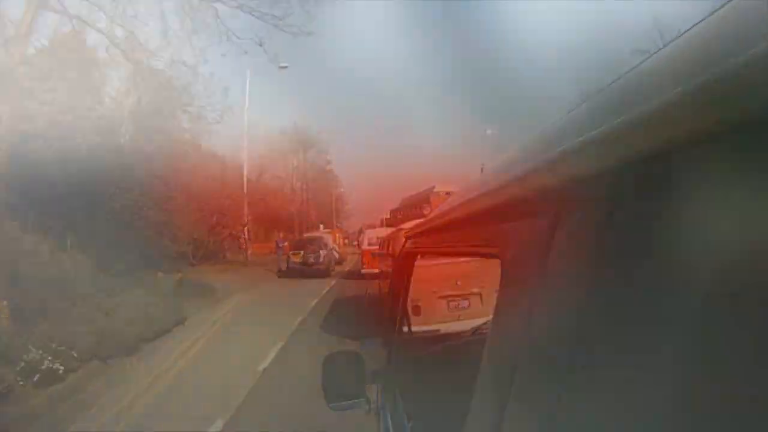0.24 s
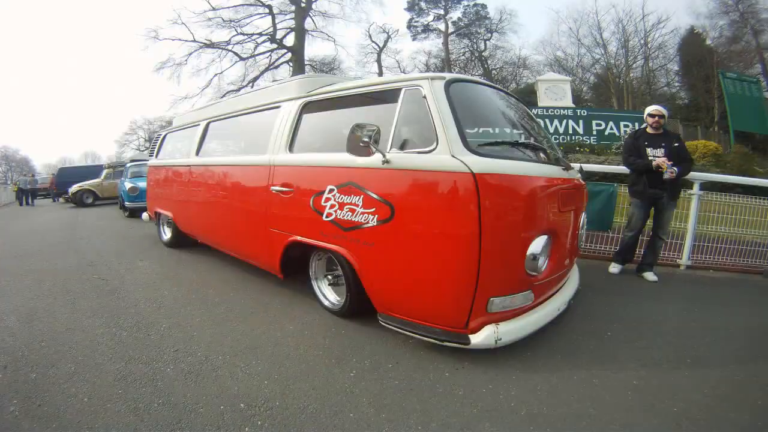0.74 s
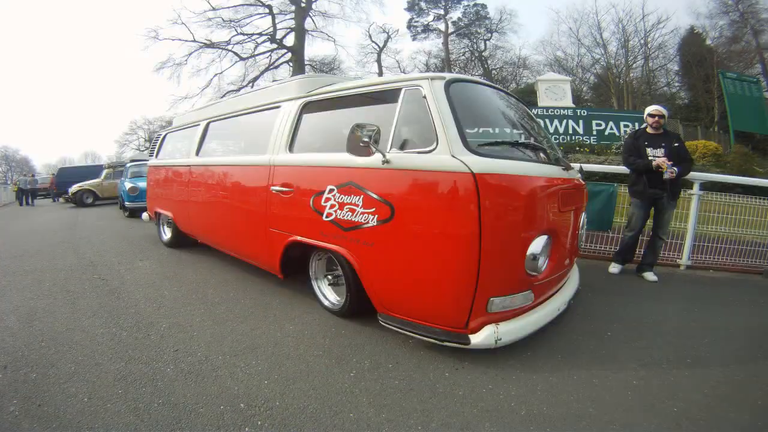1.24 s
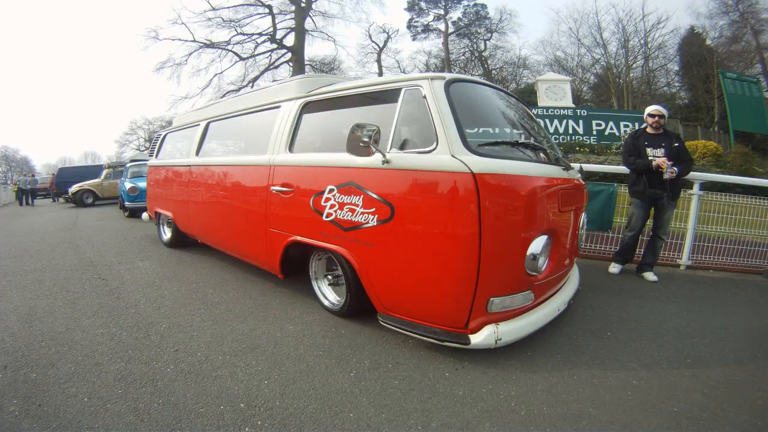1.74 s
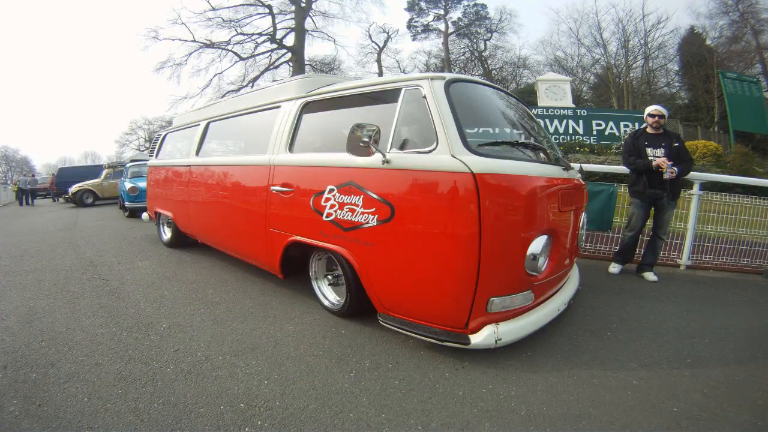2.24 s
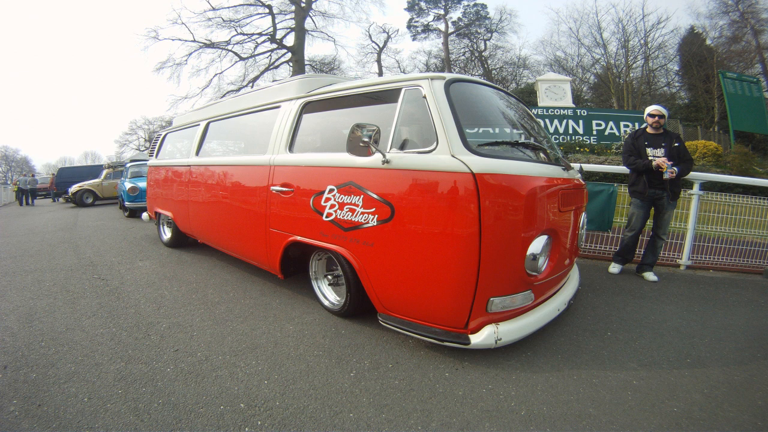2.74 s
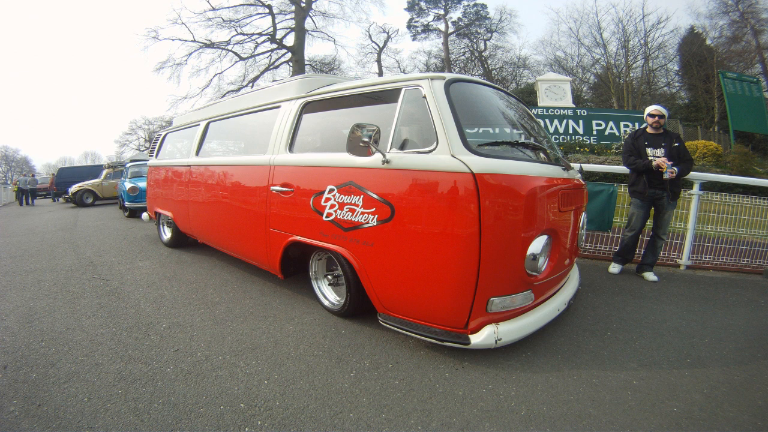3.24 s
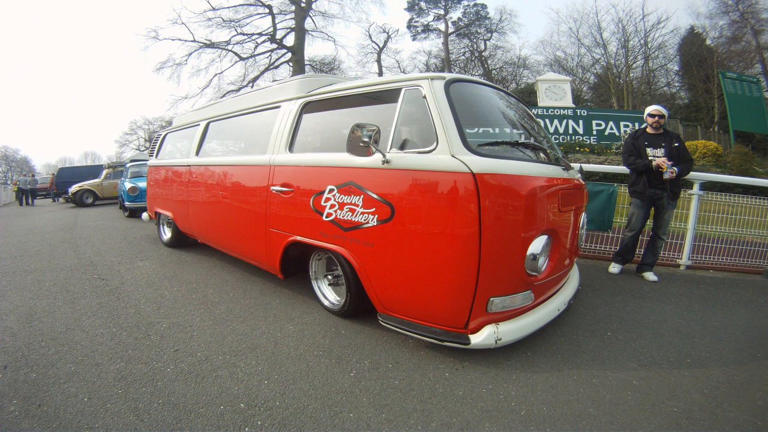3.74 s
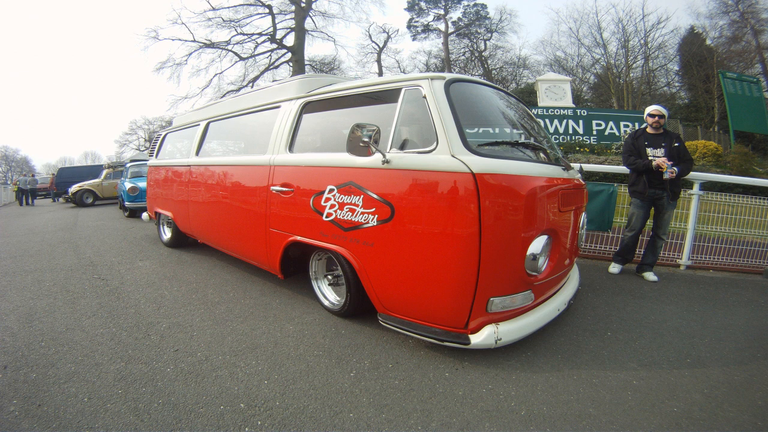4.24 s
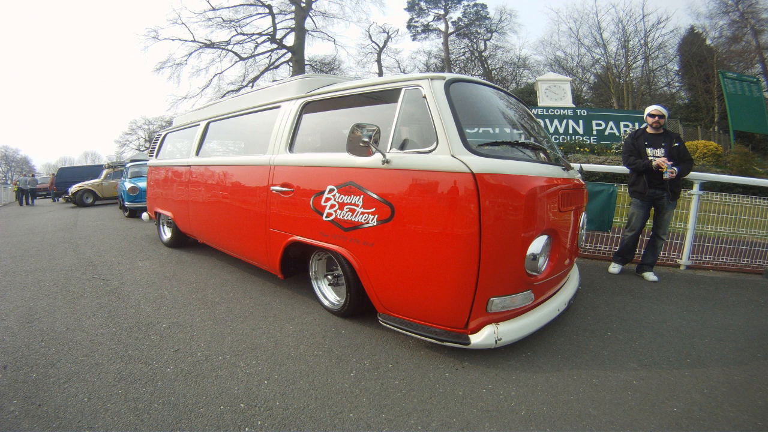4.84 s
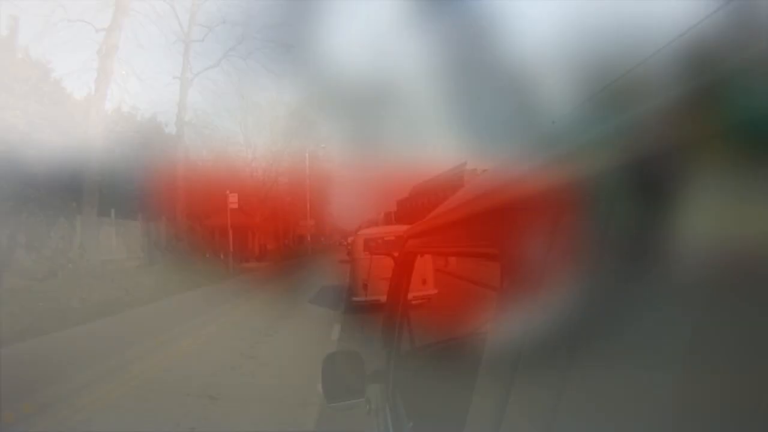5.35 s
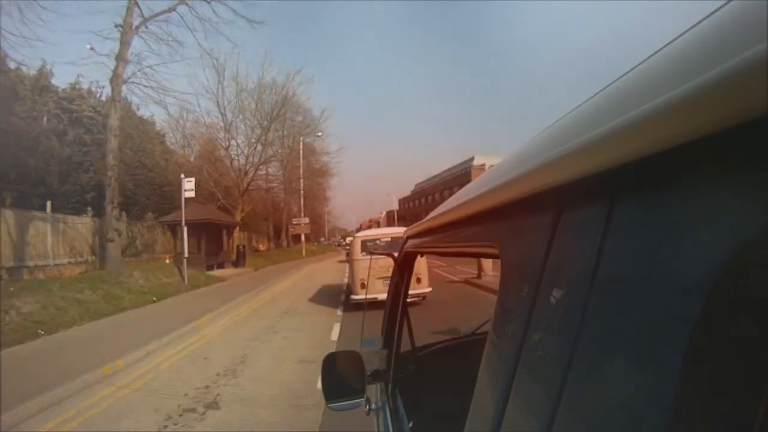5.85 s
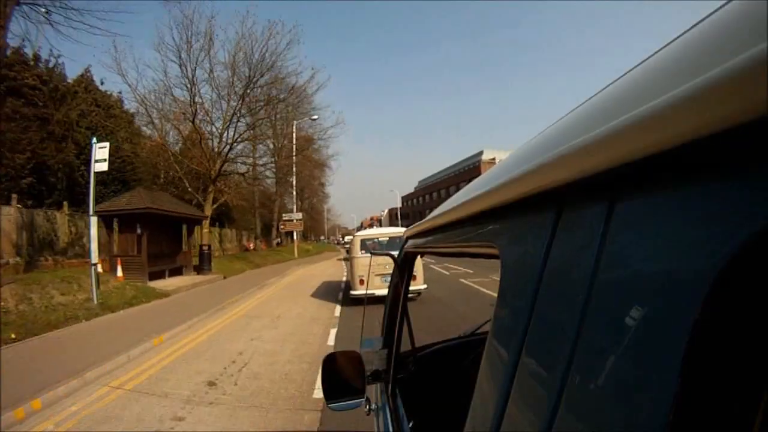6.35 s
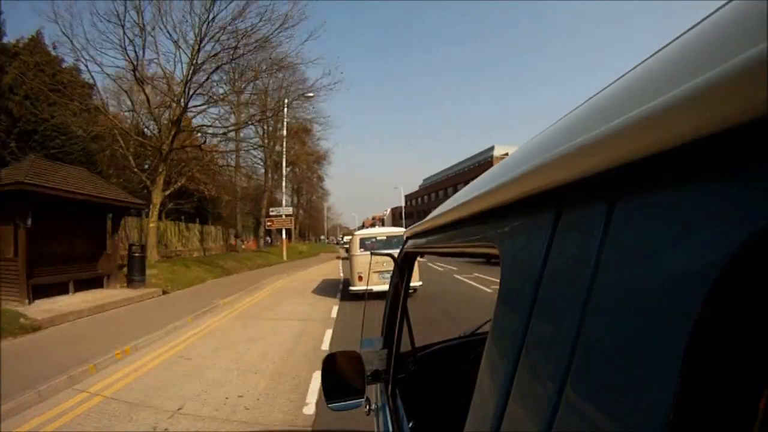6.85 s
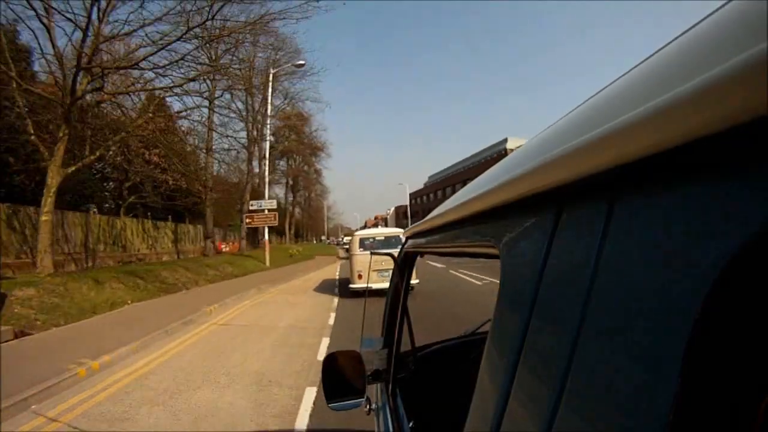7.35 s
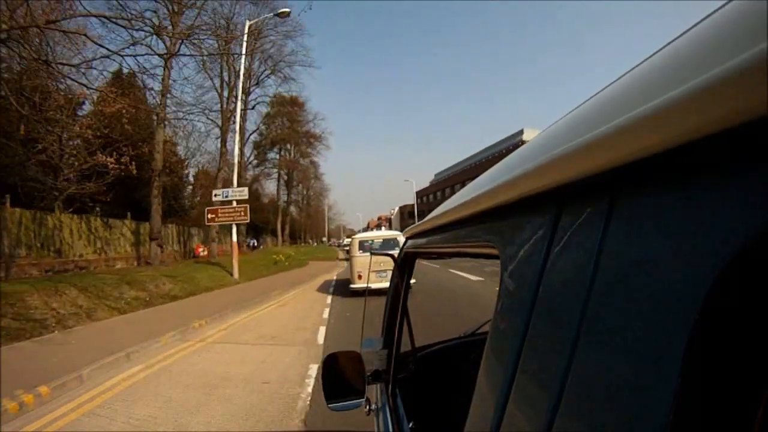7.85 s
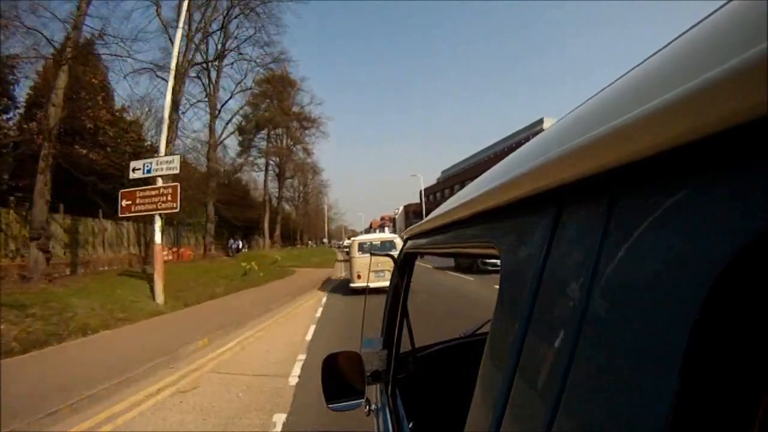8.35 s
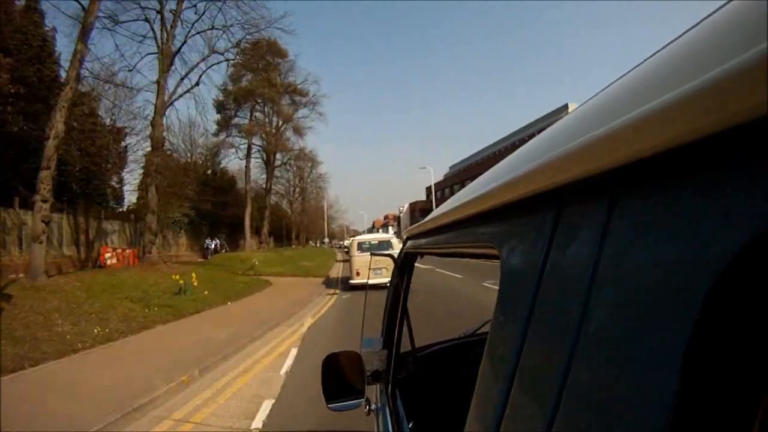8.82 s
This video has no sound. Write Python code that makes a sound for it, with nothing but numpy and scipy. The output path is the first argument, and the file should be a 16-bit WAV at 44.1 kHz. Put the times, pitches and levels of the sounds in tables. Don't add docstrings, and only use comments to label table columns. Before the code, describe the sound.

An old van's air-cooled engine idles along softly, then pulls harder and climbs in pitch over rumbling road, with bumps and a metallic rattle near the end.

```python
import sys
import numpy as np
from scipy import signal
from scipy.io import wavfile
from scipy.ndimage import uniform_filter1d

SR = 44100
rng = np.random.default_rng(int(sys.argv[2]) if len(sys.argv) > 2 else 0)


def inscribe(sig):
    pcm = np.round(np.clip(np.atleast_2d(sig).T, -1, 1) * 32767)
    wavfile.write(sys.argv[1], SR, pcm.astype(np.int16))


def amplitude_ratio(level_db):
    exponent = np.asarray(level_db, float) / 20
    return 10 ** exponent


N = 400428
T = np.arange(N) / SR


def evened(x):
    return x / np.sqrt(np.mean(x ** 2) + 1e-20)


def levelled(x, seconds):
    power = uniform_filter1d(x ** 2, int(seconds * SR))
    power = uniform_filter1d(power, int(seconds * SR / 2))
    return x / np.sqrt(abs(power) + 1e-20)


def curves(rows):
    t, *columns = np.transpose(rows)
    return [np.interp(T, t, column) for column in columns]


def read(points, hz):
    f, value = np.transpose(points)
    return np.interp(np.log(hz + 1), np.log(f + 1), value)


def bell(t, middle, half):
    return np.exp(-((t - middle) / half) ** 2 / 2)


def lifts(rows):
    t = T[::64]
    return np.interp(T, t, sum(db * bell(t, middle, half) for middle, half, db in rows))


def bursts(rows, floor_db):
    t = T[::64]
    swell = sum(amplitude_ratio(db) * bell(t, middle, half) for middle, half, db in rows)
    return amplitude_ratio(floor_db) + np.interp(T, t, swell)


def drift(top_hz, step=1):
    steps = rng.standard_normal(N // 128 + 2)
    slow = signal.filtfilt(*signal.butter(1, min(top_hz, 150), fs=SR / 128), steps)
    return np.interp(np.arange(0, N, step) / 128, np.arange(len(slow)), evened(slow))


def resonate(x, hz, width):
    r = np.exp(-np.pi * width / SR)
    return 2 * signal.lfilter([1 - r], [1, -r * np.exp(2j * np.pi * hz / SR)], x).real


def panel_ring():
    hiss = resonate(resonate(rng.standard_normal(N), 719, 80), 719, 80)
    return amplitude_ratio(-50.5 - 0.53 * T) * evened(hiss)


# t/s, half length/s, level/dB
ROCKS = [(.26, 0.1, -27.5), (.63, 0.066, -29), (1.04, 0.066, -32), (1.72, 0.17, -25), (2.05, 0.093, -29),
         (2.38, 0.062, -35), (2.6, 0.053, -27), (2.76, .07, -28), (3.33, 0.055, -33), (3.72, 0.063, -25),
         (4.17, 0.11, -22), (4.45, 0.033, -26), (4.63, .07, -27), (5.2, 0.081, -26), (5.55, .12, -25),
         (5.99, 0.093, -27), (6.45, 0.15, -29), (6.93, 0.047, -22), (7.23, 0.042, -17), (7.47, .05, -24),
         (7.71, 0.08, -23), (8.08, 0.058, -24), (8.25, .04, -26), (8.45, 0.056, -18.5), (8.75, 0.15, -28),
         (9.07, 0.062, -19)]
# t/s, half length/s, level/dB
BOOMS = [(.5, 0.2, -27), (1.08, 0.22, -26.5), (1.75, 0.33, -30), (2.24, 0.18, -27), (3.0, 0.1, -32),
         (3.5, 0.19, -29), (4.2, 0.24, -21), (4.75, 0.25, -22.5), (5.22, 0.13, -26), (5.75, 0.11, -26),
         (.15, 0.061, -29.5), (2.7, 0.15, -31), (5.5, 0.064, -29), (5.9, .08, -30), (6.5, 0.2, -25),
         (7.9, 0.053, -30), (7.0, 0.099, -19.5), (7.45, 0.19, -22), (8.25, 0.12, -24), (8.75, 0.13, -21.5)]
# t/s, f/Hz
CABIN = [(0, 86), (2.2, 86), (3.8, 87), (4.5, 78), (5.6, 85), (6.4, 93), (7.0, 95), (7.7, 102), (8.15, 106),
         (8.4, 86), (9.08, 84)]


def rumble():
    shaking = rng.standard_normal(N)
    sway = levelled(resonate(resonate(shaking, 26.7, 1.8), 30.6, 3.5), 0.11)
    low_pass = signal.butter(2, 10.5, fs=SR, output="sos")
    air = signal.sosfilt(low_pass, rng.standard_normal((2, N)))
    angle = 2 * np.pi * np.cumsum(curves(CABIN)[0]) / SR
    boom = air[0] * np.cos(angle) + air[1] * np.sin(angle)
    return bursts(ROCKS, -41) * sway + bursts(BOOMS, -53) * levelled(boom, 0.16)


# t/s, thump level/dB, gain dip/dB, recovery/s
JOLTS = [
    (4.634, -22, 1.5, 0.16),
    (6.919, -22, 4.5, 0.078),
    (7.201, -20, 7, 0.43),
    (8.119, -20, 6.5, 0.15),
    (8.598, -20, 4, 0.12),
]


def jolts():
    t, out = np.arange(3000) / SR, np.zeros(N)
    push = np.sin(2 * np.pi * 85 * t) * np.exp(-t / 0.024) * np.minimum(t / 0.009, 1)
    for s, db, *_ in JOLTS:
        out[round(s * SR) - 130:][:len(t)] += amplitude_ratio(db) * push
    return out


# t/s, level/dB
KNOCKS = [(6.899, -36), (6.9022, -35), (6.905, -32), (6.908, -33), (6.9105, -32), (6.9122, -28),
          (6.9148, -32), (6.9168, -28.5), (6.9196, -29.5), (6.9208, -32), (6.9235, -32), (6.937, -41),
          (7.131, -42), (7.1767, -36), (7.181, -34), (7.188, -40), (7.194, -42), (7.2095, -37), (7.29, -40)]
# f/Hz, level/dB, time to fall 60 dB/s
LOOSE = [(1064, -2.5, .04), (1400, -8, .03), (1700, -6, 0.023), (2000, -8, .03), (2230, -6, 0.027),
         (2750, -3.5, 0.05), (3480, -2.5, 0.05), (3650, -11, 0.035), (5290, -7, 0.06)]


def knocks():
    t, out = np.arange(3000) / SR, np.zeros(N)
    for s, db in KNOCKS:
        ring = sum(amplitude_ratio(d - 60 * t / t60) * np.sin(2 * np.pi * (hz * t + rng.random()))
                   for hz, d, t60 in LOOSE)
        scrape = 0.66 * rng.standard_normal(len(t)) * np.exp(-t / .003)
        hit = (ring * np.exp(-t / 0.016) + scrape) * np.minimum(t / 0.00048, 1)
        out[round(s * SR):][:len(t)] += amplitude_ratio(db) * hit
    return out


# t/s, f/Hz, level/dB
AXLE = [(0, 100, -34), (.6, 101, -34), (1.2, 104, -32), (1.8, 109, -32), (2.25, 116.5, -31.5),
        (2.6, 125, -48), (3, 133.5, -35.5), (3.7, 145, -37), (4, 151, -39)]


def axle():
    hz, db = curves(AXLE)
    drowned_db = 40 * np.maximum(T - 3.9, 0)
    angle = 2 * np.pi * np.cumsum(hz) / SR + .5 * drift(3)
    return np.sqrt(2) * amplitude_ratio(db - drowned_db) * np.cos(angle)


# f/Hz, level/dB
STEADY_HUMS = [(195, -38), (389, -44), (780, -53), (2770, -63),
               (737.5, -55)]


def hums():
    out = np.zeros(N)
    for hz, db in STEADY_HUMS:
        out += amplitude_ratio(db + 1.2 * drift(3)) * np.cos(2 * np.pi * hz * T + .7 * drift(4))
    return out * amplitude_ratio(-.7 * T)


# t/s, half length/s, level/dB
WHIRRS = [(.2, 0.22, -49.5), (.8, 0.27, -49.5), (1.25, 0.17, -58), (3.0, .1, -57), (5.3, 0.22, -55),
          (5.9, .15, -57), (6.8, 0.14, -51), (7.6, 0.086, -47), (1.7, 0.39, -53), (3.35, 0.16, -45.5),
          (4.19, 0.07, -45), (4.5, 0.19, -41), (6.4, 0.33, -49.5), (8.05, 0.09, -40), (8.5, 0.16, -41),
          (8.8, 0.16, -40.5)]


def whirr(turns):
    hz, width_hz = 2150, 284
    flutter_db = 1.9 * np.cos(4 * np.pi * turns) + 1.9 * np.cos(2 * np.pi * (turns - .1))
    grain = amplitude_ratio(4 * drift(60) + flutter_db) * rng.standard_normal(N)
    ring = resonate(resonate(grain, hz, width_hz), hz, width_hz)
    return bursts(WHIRRS, -73) * evened(ring)


# f/Hz, level/dB per Hz
HISS = [(71, -14.5), (120, -11.5), (146, -8), (203, -5), (342, -24.5), (578, -13.5), (828, -27),
        (1090, -23), (1270, -31), (1540, -28), (1820, -32.5), (2170, -21), (2920, -32), (3790, -30.5),
        (6000, -47.5), (7800, -67), (13200, -120)]
# f/Hz, width/Hz, lift level/dB
TINWARE = [(140, 33, -2.5), (308, 51, 2), (675, 43, -5), (730, 40, -1.5), (896.8, 28, 14), (1094, 28, 10),
           (1548, 27, 4), (1900, 220, -2), (2093, 45, 4), (2260, 390, 1.5), (2738, 64, 9), (2936, 130, -6),
           (3113, 440, 6), (5320, 590, 8.5)]
# t/s, half length/s, lift level/dB
RATTLES = [(6.93, 0.02, 4), (7.2, 0.043, 1), (7.61, 0.064, 3.5), (8.07, 0.028, 2.5), (3.0, .1, 0.5),
           (3.45, 0.075, 1), (4.15, 0.046, 1), (8.3, .04, 0.5), (8.55, 0.04, 0.5), (8.95, .05, 0.5)]


def clatter(turns, effort_db):
    load_db = effort_db + lifts(RATTLES)
    frames, hz = N // 256 + 5, np.fft.rfftfreq(1024, 1 / SR)
    a, b, patches = rng.standard_normal((frames, 513, 3)).T
    patches = evened(uniform_filter1d(uniform_filter1d(patches, 14, 0), 8, 1))
    ring_db = sum(db / (1 + (2 * (hz - f) / w) ** 2) for f, w, db in TINWARE)
    frame_load_db = load_db[np.minimum(np.arange(frames) * 256, N - 1)]
    octaves_up = np.log2(np.clip(hz, 3500, 6000) / 3500)
    bright_db = .6 * np.outer(octaves_up, np.minimum(frame_load_db, 5))
    z = (a + 1j * b) * amplitude_ratio((read(HISS, hz) + ring_db)[:, None] + bright_db + 0.4 * patches)
    noise = signal.istft(z, nperseg=1024, noverlap=768)[1][:N]
    throb_db = 0.38 * np.cos(2 * np.pi * turns) + 0.63 * np.cos(8 * np.pi * turns) + 0.29 * drift(36)
    return amplitude_ratio(load_db - 34 + throb_db) * evened(noise)


# f/Hz, width/Hz, level/dB
PIPE = [(560, 90, -3), (900, 60, -3), (1120, 70, 0), (1300, 150, -9), (1500, 90, -6)]


def exhaust(turns, pipe_db):
    puffs = (0.67 + np.exp(-(4 * turns % 1) / 0.07)) * rng.standard_normal(N)
    ring = sum(amplitude_ratio(db) * resonate(resonate(puffs, hz, w), hz, 1.6 * w) for hz, w, db in PIPE)
    return amplitude_ratio(pipe_db - 47.5) * evened(ring)


# f/Hz, level/dB
BODY = [(25, -45), (50, -45), (90, -30.5), (110, -36), (145, -50.5), (200, -38), (235, -47.5), (270, -46),
        (330, -52.5), (430, -54), (500, -60), (560, -44), (640, -68.5), (1100, -61.5)]
LOW_ORDERS_DB = [5, 6.5, 0, 4, 0, 3.5, 6, 6.5, 1, 0, 1.6, 3, -3, -3.5, 2.5, 1]
WEAKER = (18, 21, 24, 26, 38)
# t/s, level/dB
FIRING = [(0, -44), (0.4, -49), (0.8, -50), (1.25, -34), (1.9, -50), (3.5, -44), (3.63, -34), (4.0, -36),
          (4.27, -21.5), (4.75, -18.5), (5.4, -18), (6.0, -20.5), (6.5, -34.5), (6.9, -14), (7.3, -11.5),
          (7.9, -14), (8.3, -14), (9.08, -20.5)]
# t/s, half length/s, level/dB
FALTERS = [(5.0, 0.049, -15), (6.12, 0.059, -21), (7.08, 0.075, -5.5), (7.24, 0.033, 4), (8.1, 0.076, -2),
           (8.5, .05, -7.5), (8.117, .008, 5.5), (8.597, .008, 6.5)]
# t/s, half length/s, level/dB
SURGES = [(.18, 0.04, -30), (.5, 0.078, -39), (1.75, 0.037, -25), (2.0, 0.054, -35), (2.27, 0.055, -46),
          (2.55, 0.072, -36), (2.88, 0.036, -27), (3.25, 0.071, -23), (3.5, 0.055, -24), (3.82, 0.14, -19),
          (4.13, 0.11, -29), (4.5, 0.088, -29), (4.86, 0.046, -24.5), (5.5, 0.037, -29),
          (5.92, 0.11, -32.5), (6.25, 0.094, -30.5), (6.63, 0.036, -24), (8.62, .08, -32),
          (6.9, 0.075, -30)]
# t/s, multiple, half length/s, level change/dB
TONE_SWINGS = [(2.58, 16, 0.51, 12.5), (2.67, 13, 0.12, 8), (2.87, 20, 0.54, 8.5), (3.09, 5, 0.22, 11.5),
               (2.9, 10, 0.58, 10), (3.24, 20, 0.097, 10), (3.64, 23, 0.25, 13.5), (3.8, 11, 0.19, 11),
               (3.76, 8, 0.97, 6), (4.44, 2, 0.23, 10), (4.56, 12, 0.56, 9), (4.73, 27, 0.16, 17),
               (4.75, 30, 0.13, 18), (4.72, 32, 0.11, 18), (4.82, 8, 0.28, 9.5), (4.91, 9, 0.16, 11),
               (5.65, 23, 0.13, 16), (6.48, 9, 0.24, 6), (6.63, 32, 0.21, 22), (6.84, 28, 0.29, 6.5),
               (7.1, 29, 0.18, 15), (7.56, 14, 0.2, 9), (8.25, 11, 0.32, 9), (8.1, 13, 0.21, 7),
               (8.75, 9, 0.25, 12), (8.904, 8, 0.19, 9), (8.4, 12, 0.14, 6), (7.4, 35, .4, 16),
               (5.6, 39, 0.25, 20), (4.9, 5, 0.22, 1.5), (7.6, 5, 0.17, 4), (8.74, 5, 0.3, 9),
               (7.95, 9, 0.16, 7.5), (3.65, 10, .15, 0), (1.4, 18, .2, 9), (3.85, 18, 0.12, 11.5),
               (9.1, 18, 0.153, 8), (1.8, 19, 0.29, 10.5), (8.4, 15, 0.08, 9), (4.47, 16, 0.092, 7),
               (9.0, 7, 0.12, 8.5), (8.35, 8, .1, 0), (8.3, 5, .06, 2), (8.4, 7, 0.11, 7), (5.53, 11, 0.29, 5),
               (7.6, 19, 0.15, 12), (4.9, 8, .1, 4), (5.2, 10, .1, 4), (4.95, 12, 0.11, 4.5), (4.5, 15, .12, 6),
               (1.5, 23, .5, 8), (7.0, 10, 0.14, 5), (7.1, 12, .15, 3.5),
               (7.95, 21, .15, 13.5), (6.67, 23, 0.48, 11), (8.5, 23, 0.061, 9), (4.7, 25, .15, 8),
               (6.33, 27, 0.18, 6), (6, 30, .15, 15), (4.69, 31, 0.15, 12), (4.35, 33, 0.14, 10),
               (4.63, 34, .15, 14), (4.35, 36, .15, 18), (3.33, 41, 0.12, 11), (3.6, 42, 0.16, 6),
               (2.85, 43, 0.11, -2), (2.86, 44, 0.11, 6), (8.7, 29, 0.22, 8), (4.8, 29, .15, 7),
               (4.68, 33, .12, 5), (6.13, 33, .12, 17), (5.8, 37, .3, 9), (8.5, 45, .15, -5),
               (8.5, 42, .15, 1), (4.12, 39, .15, 11), (3.9, 37, .15, 0.5), (7.7, 23, .2, -1),
               (8.9, 21, .12, 6), (7.7, 24, 0.13, 7), (4.79, 23, 0.11, 10), (8.75, 23, 0.13, 8),
               (6.64, 30, .1, 14), (8.0, 34, .1, 14), (8.8, 34, .1, 10), (3.4, 37, 0.11, 12),
               (3.19, 39, 0.091, 10), (8.4, 31, .25, 10), (8.41, 28, .08, 8), (8.0, 18, 0.11, 11),
               (8.0, 22, .1, 7), (8.21, 26, 0.078, 12), (6.89, 20, .1, 7), (1.2, 39, .8, 14),
               (4.2, 38, .12, 7), (6.3, 37, .3, 10), (6.4, 25, .12, 5), (4.4, 28, .1, 7),
               (3.88, 15, .1, 10), (8.8, 14, .18, 10), (7.57, 12, .1, 9), (5.65, 29, 0.35, 4.5),
               (6.5, 39, .3, 8), (5.8, 37, 0.18, 6),
               (.2, 7, 0.2, -16), (.1, 8, 0.18, -6), (0.27, 16, 0.37, -7.5), (1.06, 9, 0.37, -21),
           (0.98, 7, 0.27, -1), (1.43, 8, 0.22, -26), (2.31, 9, 0.25, -2), (3.6, 17, .3, -12),
           (3.1, 7, 0.22, -15), (3.3, 14, 0.26, -18), (3.36, 9, 0.32, -4), (4.4, 30, .15, -15),
           (4.1, 10, .22, -20), (4.68, 5, 0.14, -29), (4.46, 13, 0.33, -16), (4.65, 11, 0.2, -10),
           (7.5, 5, 0.086, -16), (5.4, 10, 0.34, -5), (5.6, 8, 0.3, -21), (5.76, 30, 0.55, -20),
           (5.9, 7, 0.87, -20), (6.15, 12, 0.16, -22), (6, 28, 0.17, -13), (7.3, 5, 0.087, -18),
           (6.7, 25, 0.094, 1.5), (7.62, 9, 0.26, -13), (8.4, 16, 0.21, -9), (8.45, 3, 0.15, -11),
           (8.4, 22, 0.26, -12), (8.9, 2, .2, -23), (8.55, 21, 0.16, -15), (6.5, 24, .2, -11),
           (3.1, 19, 0.24, -8), (0.75, 19, .3, -8), (1.7, 20, .2, -8), (7.05, 27, 0.1, -14),
           (4.6, 11, .12, -4), (3.56, 13, .15, -16), (1.3, 16, 0.15, -3), (4.5, 3, .3, -8),
           (6.1, 5, .2, -1.5), (5.33, 12, 0.203, -8.5), (8.75, 7, 0.14, -18), (8.7, 8, 0.082, -4),
           (5.4, 9, 0.19, -6), (8.1, 12, .2, -7), (7.12, 13, .1, -8), (6.04, 13, .15, -6),
           (2.6, 19, .25, -6),
               (5.6, 27, .12, -10), (7.12, 28, 0.081, -10), (6.13, 31, .12, -14), (5.6, 31, .2, -7),
                (4.4, 32, .12, -8), (8.4, 36, .25, -8), (8.41, 44, .1, -6), (1.8, 44, .8, -5),
                (1.4, 45, .8, -1), (1.6, 46, .9, -7), (7.7, 21, .1, -4), (8.7, 11, .14, -9),
                (5.2, 11, 0.17, -6.5), (7.35, 10, .1, -9), (1.8, 17, 1.0, -5.5), (8.65, 18, .1, -7),
                (7.35, 5, .1, -6)]


def orders(turns, cycle_hz, shell_db, pipe_db):
    firing_db = curves(FIRING)[0] + lifts(FALTERS)
    sixth_db = 20 * np.log10(bursts(SURGES, -73))
    controls = T, turns, cycle_hz, shell_db, pipe_db, firing_db, sixth_db
    t, turns, cycle_hz, shell_db, pipe_db, firing_db, sixth_db = (c[::10] for c in controls)
    passing = TONE_SWINGS
    rough_db = np.clip(.45 * shell_db, 1.2, 3)
    out, unsteady = 0, drift(4, step=10)
    for k in range(2, 47):
        in_pipe = np.clip((k * cycle_hz - 400) / 80, 0, 1)
        db = read(BODY, k * cycle_hz) + shell_db + in_pipe * (pipe_db - shell_db)
        db += LOW_ORDERS_DB[k - 2] if k < 18 else -1.5
        if k in WEAKER:
            db -= 2.5 * (1 - in_pipe)
        db += sum(lift * bell(t, s, half) for s, order, half, lift in passing if round(order) == k)
        if k == 4:
            db = firing_db
        elif k == 6:
            db = sixth_db
        else:
            db = db + rough_db * drift(6, step=10)
        wobble = .006 * k * (unsteady + .6 * drift(3, step=10))
        start = rng.random()
        if k > 20:
            start = .33 * start - .2 * k
        out = out + np.sqrt(2) * amplitude_ratio(db) * np.cos(2 * np.pi * (k * turns + start) + wobble)
    return signal.resample_poly(out, 10, 1)[:N]


# t/s, f/Hz (engine cycles per second)
SPEED = [(0.0, 13.16), (1.0, 12.39), (1.6, 12.12), (2.0, 12.31), (2.3, 12.18), (3.0, 13.12), (3.6, 14.33),
         (4.05, 15.56), (4.8, 18.02), (5.1, 18.52), (5.35, 18.35), (5.55, 18.8), (6.0, 18.95), (6.6, 19.91),
         (7.8, 22.79), (8.2, 24.21), (8.6, 26.22), (9.08, 28.8)]
# t/s, engine effort level/dB, extra exhaust flow level/dB
THROTTLE = [(0, -1.5, -9), (1.1, -2.5, -4), (2.55, -2.5, -2), (3.0, 0, -1), (3.3, 1.5, -9), (3.56, 3, -9),
            (3.7, 1, -2.5), (3.92, 2, 1), (4.3, 3.5, -7), (4.58, 6, -5.5), (4.9, 2.5, 0), (5.1, 1.5, 0),
            (5.75, 1, 1), (6.7, 2, 3), (7.9, 1, 3.5), (8.2, 7.5, 3.5), (8.6, 8.5, 7), (9.08, 4, 2.5)]


def scene():
    cycle_hz = curves(SPEED)[0]
    effort_db, flow_db = curves(THROTTLE)
    octaves = np.log2(cycle_hz / cycle_hz[0])
    shell_db = -4.5 + 0.91 * effort_db + 4.0 * octaves
    pipe_db = effort_db + flow_db
    turns = np.cumsum(cycle_hz) / SR
    road = panel_ring() + rumble() + jolts() + knocks() + axle()
    fan = hums() + whirr(turns)
    engine = clatter(turns, effort_db) + exhaust(turns, pipe_db) + orders(turns, cycle_hz, shell_db, pipe_db)
    return (road + fan + engine)[None]


def top_cut(x):
    return signal.sosfilt(signal.butter(12, 15380, fs=SR, output="sos"), x)


def record(dry):
    dip_db = sum(dip * (T > s + .006) * np.exp(-np.maximum(T - s, 0) / back) for s, _, dip, back in JOLTS)
    high_pass = signal.butter(3, 21, "high", fs=SR, output="sos")
    ducked = signal.sosfilt(high_pass, dry) * amplitude_ratio(-uniform_filter1d(dip_db, 200))
    slow = signal.resample_poly(ducked, 40, 147, axis=1)
    held = np.repeat(slow, 4, axis=1)
    held = signal.resample_poly(held, 147, 160, axis=1)[:, :N]
    return top_cut(held)


dry = scene()
out = record(dry)
inscribe(out)
```